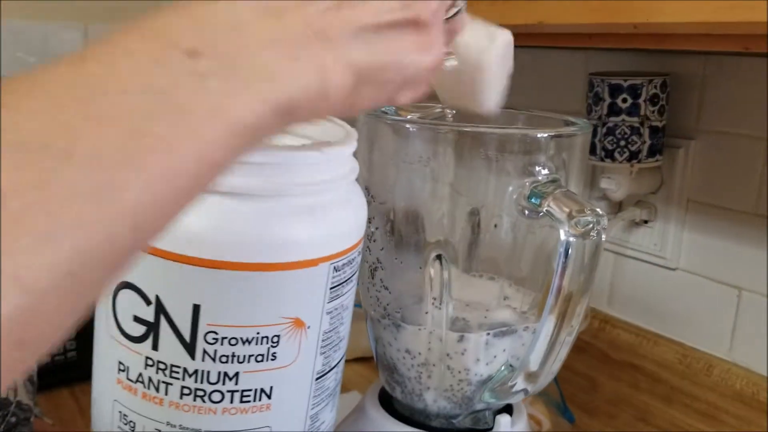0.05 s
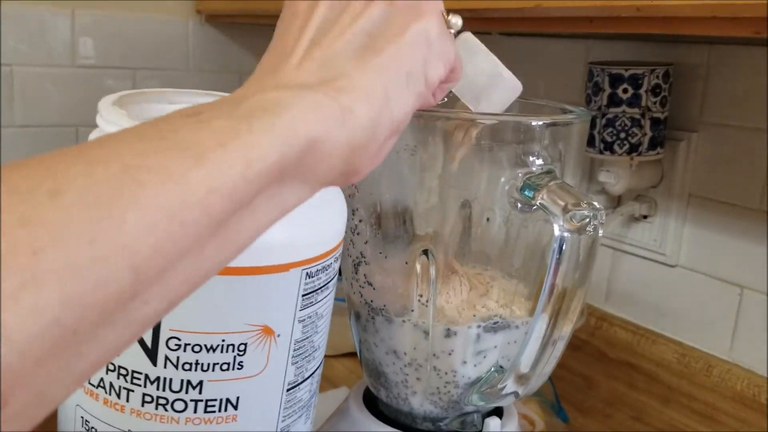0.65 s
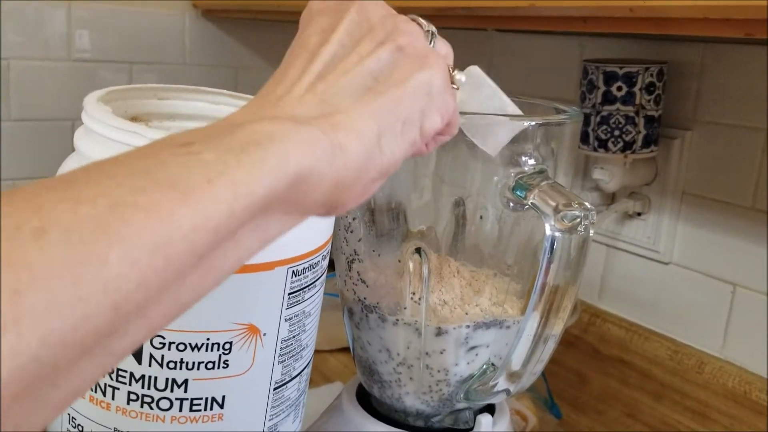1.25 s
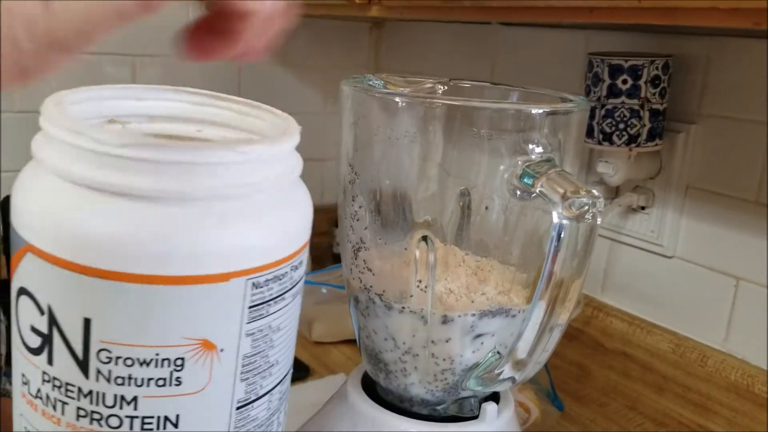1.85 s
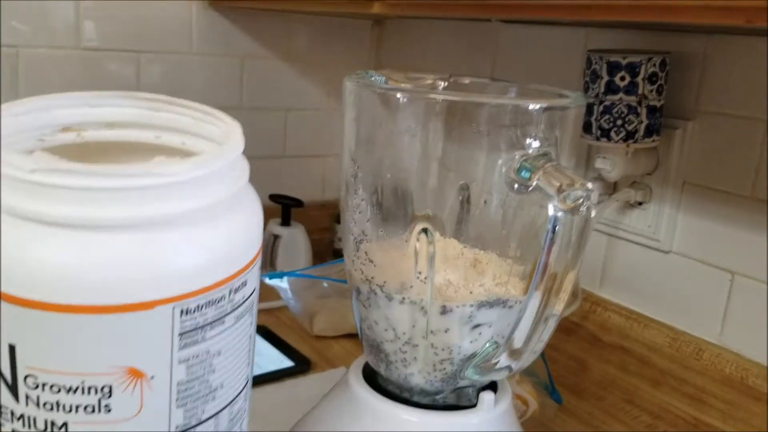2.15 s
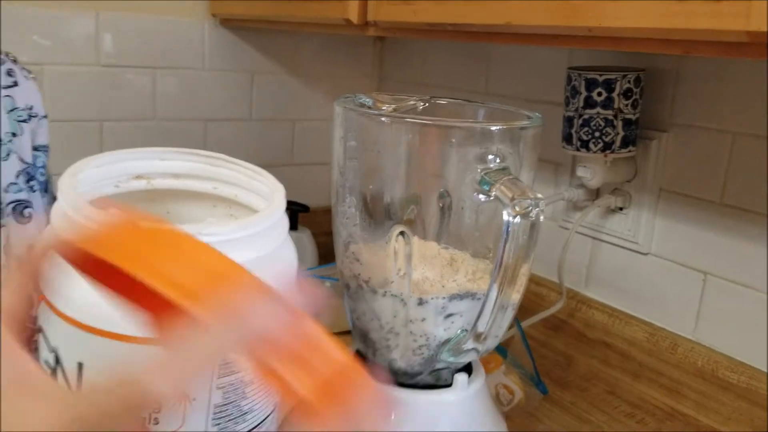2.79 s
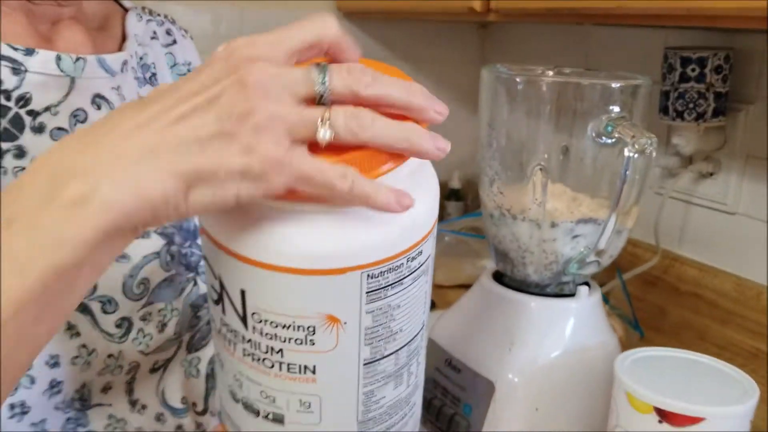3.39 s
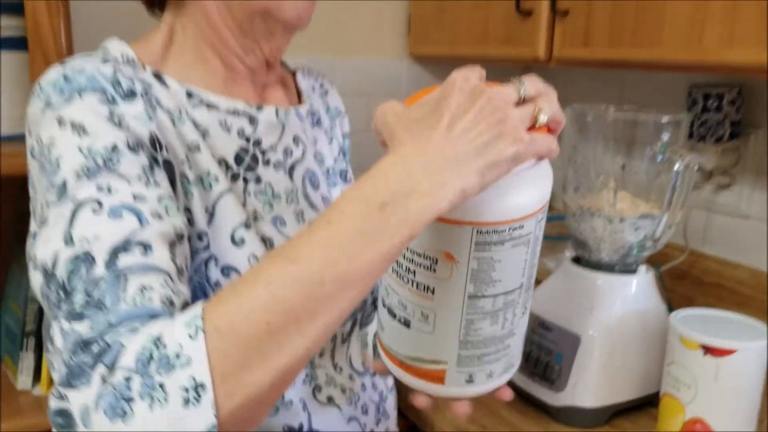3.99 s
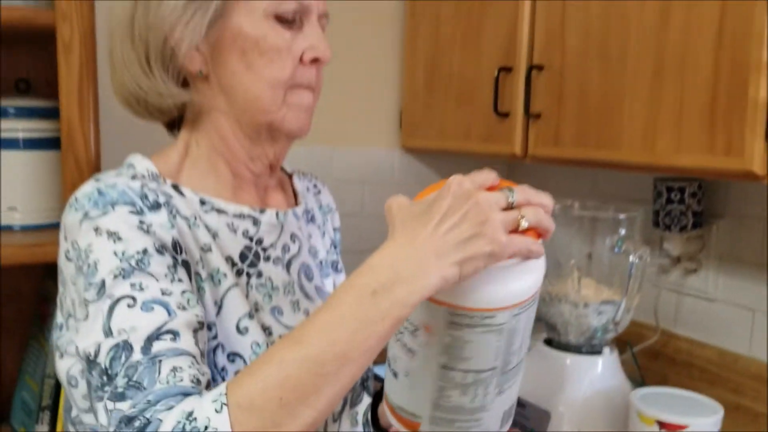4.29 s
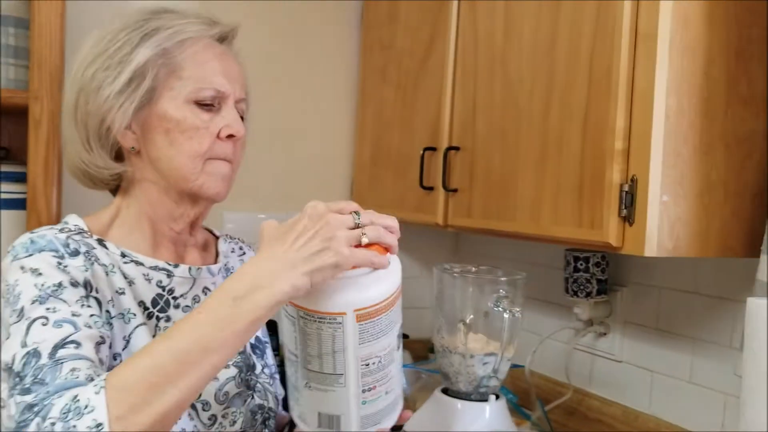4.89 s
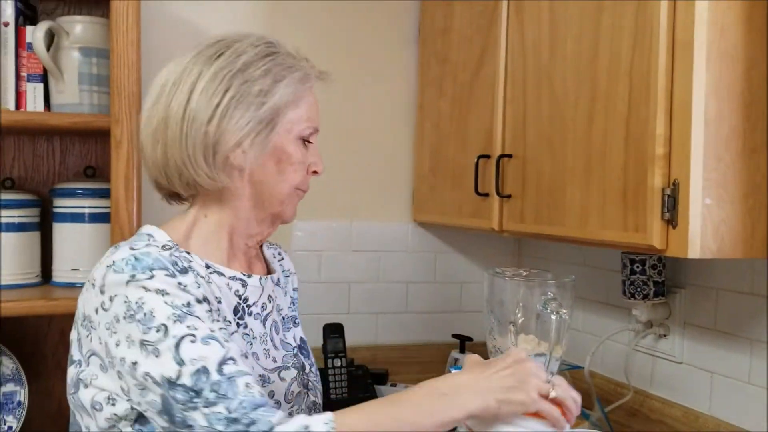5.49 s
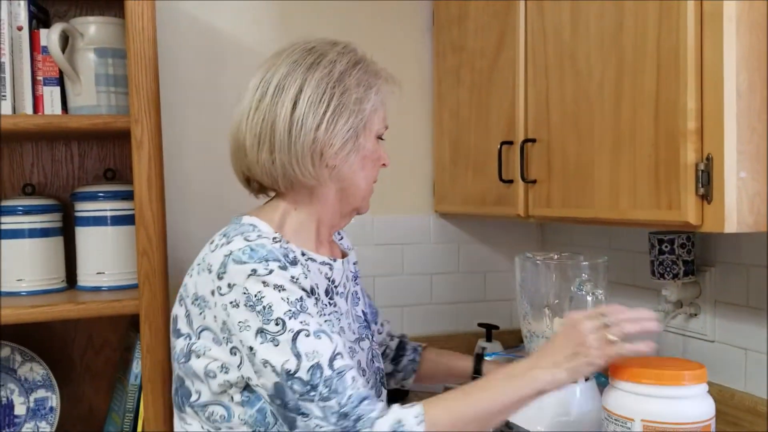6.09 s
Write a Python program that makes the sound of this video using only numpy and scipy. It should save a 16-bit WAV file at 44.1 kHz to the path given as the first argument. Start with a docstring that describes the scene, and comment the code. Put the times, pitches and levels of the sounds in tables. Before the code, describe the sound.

A faint appliance hum runs throughout in a small, slightly reverberant kitchen. In the first half second, powder slides very softly off a plastic scoop. From 0.5 to 1.2 seconds the scoop taps about five times on a glass blender jar, each click leaving a light ring. Around 1.8 to 2.1 seconds it drops into a plastic tub with small knocks and ticks. Hands and a sleeve brush the tub until about 3 seconds. The lid knocks twice, then claps on with a loud hollow clack at 3.2 seconds. It is screwed down in short, dry rubbing turns with soft bumps until about 4.5 seconds, followed by more quiet rubbing. At 5.5 seconds the tub bumps and scuffs on a wooden counter, then lands at 5.8 seconds with the loudest thud, rocking once. A slight scrape follows just after 6 seconds.

```python
"""A plastic tub is handled, its lid clapped on and screwed down, and its base set on a wooden counter.
Each impact excites damped modes of wall or wood; hands, sleeve and lid rub in short strokes of friction
noise. Before this, powder slides off a plastic scoop, which is tapped on the rim of a ringing glass
blender jar and dropped into the tub. The small kitchen reverberates and an appliance hums faintly."""
import sys
import numpy as np
from scipy import signal
from scipy.fft import rfft, irfft
from scipy.io import wavfile

SR = 44100
rng = np.random.default_rng(int(sys.argv[2]) if len(sys.argv) > 2 else 0)


def generate_wav(signal):
    """Clip the signal to [-1, 1] and save it as 16-bit WAV at the path in sys.argv[1]."""
    frames = np.transpose(np.atleast_2d(signal))
    scaled = np.clip(frames, -1, 1) * 32767
    pcm = np.round(scaled).astype(np.int16)
    wavfile.write(sys.argv[1], SR, pcm)


N = 275625
TIME = np.arange(N) / SR
AGE = np.arange(SR) / SR  # seconds since an onset

# Likeness of the two channels: frequency_hz, correlation
COHERENCE = [(60, 0.71), (180, 1), (350, 0.72), (700, 0.53), (1400, 0.062), (4000, 0.12), (14000, 0.025)]
# Reverberation time: frequency_hz, t60_s
ROOM_DECAY = [(100, 0.32), (250, 0.45), (800, 0.46), (2000, 0.45), (5000, 0.32), (14000, 0.29)]
# Appliance motor partials: pitch_hz, level_db
MOTOR_PARTIALS = [(58.5, -59), (117.5, -62)]

# Spectral shapes of continuous noise: frequency_hz, relative_density_db
AIR_SPECTRUM = [(20, -56), (30, -38), (45, -0.5), (58, -9.5), (78, -7.5), (115, -3.5), (140, -4),
                (200, -11.5), (260, -10.5), (430, -17), (520, -23.5), (750, -26.5), (1300, -29),
                (1700, -43.5), (2600, -36), (3200, -49), (6500, -50.5), (9000, -64), (12500, -42.5),
                (16000, -47)]
HISS_SPECTRUM = [(3500, -7.5), (5500, -4), (7300, -5), (9000, -8.5), (11000, -1.5), (12700, -1.5),
                 (14500, -4.5), (16000, 0.5)]  # light touch
SCRAPE_SPECTRUM = [(900, -8), (1500, -12), (2200, 3), (3200, -2.5), (4300, 0), (5200, -9), (7000, -8),
                   (10000, -18)]  # pressed contact
CAVITY_SPECTRUM = [(60, 2), (250, -1), (500, -4), (800, -5.5), (1300, -4.5), (1900, -7), (3000, -21),
                   (8000, -62)]  # hollow of the vessel
RUMBLE_SPECTRUM = [(30, -22), (55, 13), (85, -7), (120, 3), (190, 3.5), (280, -17), (450, -45), (1000, -45),
                   (4000, -66)]  # counter top
# Spectral shapes of densely packed modes: frequency_hz, relative_density_db
SCOOP_SPECTRUM = [(200, -1.5), (450, -11), (620, 6), (850, -16), (1700, -11), (2050, -16.5), (2500, -1.5),
                  (3500, -11), (4400, -9), (6300, -13.5), (9000, -19), (16000, -22)]
WALL_SPECTRUM = [(120, -28), (300, -5.5), (900, -8.5), (1600, -6), (3300, -4), (5000, -13.5), (7000, -20),
                 (9000, -30.5), (13000, -27.5), (16000, -42)]
WOOD_SPECTRUM = [(100, -20), (200, -1.5), (700, 2), (1300, -6.5), (2100, -14.5), (3000, -32.5), (5000, -37),
                 (9000, -21), (16000, -66)]
# Separately audible modes: pitch_hz, relative_level_db, t60_s
JAR_MODES = [(1156, 0, .38), (2848, -1.5, .32), (4727, -13, .22)]
TUB_MODES = [(205, -4, .15), (255, 0, .14), (320, 0, .15), (430, -4, .09), (600, -4, .06), (735, -6, .05),
             (861, -3, .05), (980, -1, .06), (1280, 0, .07), (1730, -8, .05), (1850, -9, .04),
             (2630, -9, .04), (3010, -5, .04), (3180, -3, .05), (3880, -7, .04), (5360, -11, .03)]
COUNTER_MODES = [(58.6, -24, 0.32), (109, -16, 0.21), (187.3, 3, 0.3), (215.3, 8.5, 0.22),
                 (228, -0.5, 0.51), (311.5, 2, 0.23), (456, -4, 0.14), (544.4, -5.5, 0.71), (683, -1, 0.24),
                 (628, 0, 0.26), (785, 5, 0.15), (860, 5.5, 0.024), (1196, -9.5, 0.6), (1450, -28, 0.2),
                 (1572, -36, .12), (1854, -13, 0.15), (1910, -22, 0.3)]

# Sliding contacts: start_s, length_s, strength_db, pressure_db
POWDER_POURS = [(.02, 0.39, -78, -1), (.16, .055, -66.5, -13), (.5, 0.14, -84.5, 13.5)]
HAND_STROKES = [(2.308, 0.026, -47, -2), (2.35, 0.14, -57, 5.5), (2.49, 0.14, -65.5, 6),
                (2.69, .18, -58, 2), (2.99, 0.093, -54, 0.5), (3.09, 0.077, -56.5, -1),
                (4.0, .16, -57.5, -23), (4.645, 0.22, -53, -11), (5.085, 0.32, -58, -0.5),
                (5.33, 0.28, -56, -6), (6.09, 0.052, -71.5, 18.5), (6.155, .085, -58, 13)]
LID_STROKES = [(3.16, 0.1, -49.5, 3), (3.26, 0.29, -61, -4), (3.52, 0.098, -54, 0.5),
               (3.61, 0.13, -49.5, 0.5), (3.72, 0.14, -60.5, 7), (3.86, 0.29, -67, 2.5),
               (3.96, 0.069, -52, -1), (4.245, 0.31, -50.5, 1), (4.97, 0.083, -61.5, 7.5)]
TUB_DRAG_STROKES = [(5.465, 0.086, -60, 5.5), (5.6, 0.1, -66.5, 11.5), (5.69, 0.065, -57, 6.5),
                    (5.8, .09, -59.5, 14.5), (5.91, .16, -71, 17)]
# Quick resonant strokes: middle_s, half_length_s, pitch_hz, level_db
SWISH_STROKES = [(0.543, 0.025, 1740, -62.5), (2.435, 0.039, 2320, -56), (5.299, 0.05, 2460, -62.5)]
# Scoop striking the jar's rim: start_s, strength_db
RIM_TAPS = [(.514, -79), (0.536, -64.5), (0.722, -50.5), (0.883, -50), (1.089, -58.5), (1.224, -52.5)]
# Plastic edges catching: start_s, level_db
EDGE_CATCHES = [(1.716, -64), (1.91, -60.5), (1.985, -67), (2.109, -49.5), (2.307, -57), (2.954, -64),
                (2.974, -65), (3.008, -74), (3.039, -50), (3.281, -52), (4.248, -57.5), (5.458, -45),
                (5.693, -54), (6.098, -65)]
# Scoop, fingers and lid striking the tub: start_s, flex_pitch_hz, strength_db, hardness_db
WALL_KNOCKS = [(0.345, 317, -69.5, 5.5), (1.752, 356, -57, 4.5), (1.787, 255, -45, -27),
               (1.929, 343, -52.5, 4), (2.848, 308, -62, -1), (3.039, 332, -40, -12),
               (3.118, 352, -46, -15), (3.233, 272.4, -27.5, -5.5), (3.324, 328, -51.5, -2),
               (3.471, 156, -45.5, -17.5), (3.515, 136, -47.5, -30), (3.635, 150, -48.5, -10),
               (3.989, 304, -55.5, 1), (4.249, 335, -63.5, 6), (4.981, 305, -53, -18),
               (5.088, 300, -72.5, 9), (5.459, 236, -39, -11.5), (5.467, 196, -35.5, -15),
               (5.526, 200, -56, 1), (5.604, 302, -48.5, -9), (5.692, 309, -52, -0.5), (6.099, 295, -60, 1)]
# Position of the knocks within the scene: time_s, left_over_right_db
TUB_PAN = [(1.8, 1), (3.2, 0), (5.5, -.5)]
# Counter taking the tub's weight: start_s, level_db
COUNTER_THUDS = [(5.466, -34), (5.793, -41)]
# Tub's base striking the counter: start_s, strength_db, low_cutoff_hz
BASE_LANDINGS = [(5.785, -21.5, 440), (5.793, -25.5, 131), (5.838, -32.5, 109)]


def from_db(db):
    """Amplitude grows tenfold every 20 dB."""
    return 10 ** (np.asarray(db) / 20)


def unit_power(x):
    """Division by the RMS value gives unit power."""
    return x / np.sqrt(np.mean(x ** 2) + 1e-20)


def unit_attack(x):
    """An impact is scaled to unit power over its first 20 ms."""
    return x / np.sqrt(np.mean(x[..., :SR // 50] ** 2) + 1e-20)


def at_hz(points, hz):
    """Interpolation on a logarithmic frequency axis."""
    frequencies, values = np.transpose(points)
    return np.interp(np.log(hz), np.log(frequencies), values)


def butter(x, hz, kind, order=2):
    """A causal Butterworth filter has a maximally flat passband."""
    return signal.sosfilt(signal.butter(order, hz, kind, fs=SR, output="sos"), x + 1e-18)


def band(x, low_hz, high_hz):
    """Cascaded filters give crossover slopes of 24 dB per octave."""
    for _ in range(2):
        x = butter(butter(x, low_hz, "high"), high_hz, "low")
    return x


def add(out, start_s, sound):
    """Superposition: a sound adds linearly to the mix."""
    start = int(start_s * SR)
    out[:, start:start + sound.shape[-1]] += sound[..., :N - start]


def panned(x, db):
    """A level difference between the ears shifts a source, leftward when positive."""
    return x * from_db([[db / 2], [-db / 2]])


def noise(spectrum, size):
    """Coloured noise in a diffuse field is partly coherent in the bass, incoherent in the treble."""
    hz = np.maximum(np.arange(size // 2 + 1) * SR / size, 1)
    coherence = np.clip(at_hz(COHERENCE, hz), 0, 1)
    mid, side = rfft(rng.standard_normal((2, size)))
    pair = np.sqrt(1 + coherence) * mid + np.sqrt(1 - coherence) * side * [[1], [-1]]
    return unit_power(irfft(pair * from_db(at_hz(spectrum, hz)), size))


def decay(t60_s):
    """Damping lowers a free vibration exponentially, by 60 dB in t60_s."""
    return from_db(-60 * AGE / t60_s)


def ring(modes, spread_db):
    """A struck body vibrates as a sum of damped modes, each excited with a random strength."""
    out = np.zeros(SR)
    for k, (hz, db, t60_s) in enumerate(modes):
        amplitude = (-1) ** k * from_db(db + spread_db * rng.standard_normal())
        out += amplitude * np.sin(2 * np.pi * hz * AGE) * decay(t60_s)
    return unit_attack(out)


def crack(spectrum, t60_s, snap_db):
    """Overlapping modes merge into noise: a brief snap, then a short decay."""
    envelope = decay(t60_s) + from_db(snap_db) * np.exp(-AGE / .002)
    return unit_attack(noise(spectrum, SR) * envelope)


def kitchen(x, wet_db):
    """Reflections from tiles and cupboards add a diffuse tail, longest in the middle register."""
    edges_hz = np.geomspace(80, 18000, 9)
    white = noise([(20, 0), (20000, 0)], SR)
    tail = sum(butter(white, [low, high], "band") * decay(at_hz(ROOM_DECAY, np.sqrt(low * high)))
               for low, high in zip(edges_hz, edges_hz[1:]))
    tail *= np.clip(AGE / .005 - .5, 0, 1)  # reflections follow the direct sound
    tail /= np.sqrt(np.sum(tail ** 2) / 2)
    return x + from_db(wet_db) * signal.fftconvolve(x, tail, axes=1)[:, :N]


def room_tone(air_db=-55.5, waver_rad=.44, waver_hz=11.4):
    """Phase modulation makes a motor's hum waver over low air noise."""
    waver = waver_rad * unit_power(butter(rng.standard_normal(N + SR), waver_hz, "low")[SR:])
    hum = sum(from_db(db) * np.sqrt(2) * np.sin(2 * np.pi * hz * TIME + waver)
              for hz, db in MOTOR_PARTIALS)
    return from_db(air_db) * noise(AIR_SPECTRUM, N) + hum


def edge_tick():
    """The brief contact of a hard edge radiates only treble."""
    return butter(crack(HISS_SPECTRUM, t60_s=.025, snap_db=0), 6300, "high", order=3)


def edge_catches():
    """Edges of scoop and lid catch on the tub, each catch a light impulse."""
    out = np.zeros((2, N))
    for start_s, db in EDGE_CATCHES:
        add(out, start_s, from_db(db) * edge_tick())
    return kitchen(out, wet_db=-8)


def scoop_taps(firm_db=-49, ring_slope=.83, rock_slope=.19, rock_hz=53):
    """Impact excites free vibration: the scoop clicks, the jar rings, the blender rocks on its feet."""
    clicks, ticks, ringing = np.zeros((3, 2, N))
    rocking = np.sin(2 * np.pi * rock_hz * AGE) * decay(t60_s=.75)
    for start_s, db in RIM_TAPS:
        add(clicks, start_s, from_db(db + 4.5) * crack(SCOOP_SPECTRUM, t60_s=.085, snap_db=-16))
        add(ticks, start_s, from_db(db - 1.5) * edge_tick())
        drop_db = firm_db - db  # jar and blender follow only part of a softer tap's drop
        add(ringing, start_s, from_db(firm_db - ring_slope * drop_db) * ring(JAR_MODES, spread_db=4))
        add(ringing, start_s, from_db(firm_db + 4 - rock_slope * drop_db) * rocking)
    return kitchen(clicks, wet_db=-5.5) + kitchen(ticks, wet_db=-7) + ringing


def friction(spectrum, grain_db):
    """Tiny slips cluster in clumps of a few milliseconds, modulating the friction noise."""
    clumps = unit_power(butter(rng.standard_normal(N), 176, "low"))
    return unit_power(noise(spectrum, N) * from_db(grain_db * clumps))


def grit(per_s=70, size_db=4):
    """Pressed contacts catch and snap free in sparse slips, independently, as a Poisson process."""
    caught = rng.random(N) < per_s / SR
    sizes = from_db(size_db * np.minimum(rng.exponential(1, N), 3))
    impulses = caught * sizes * rng.choice([-1, 1], N)
    snap = crack(SCRAPE_SPECTRUM, t60_s=.008, snap_db=0)
    return unit_power(signal.fftconvolve(impulses[None], snap, axes=1)[:, :N])


def strokes(rows, attack_share, swell_db, release_s):
    """Friction swells with sliding speed; strokes add in power to give gains of touch and pressure."""
    light, pressed = np.zeros((2, 1, N))
    for start_s, length_s, db, pressure_db in rows:
        speed = np.sin(np.pi * np.minimum(AGE / length_s, 1))
        attack = np.sin(np.pi / 2 * np.minimum(AGE / (attack_share * length_s), 1)) ** 2
        release = np.exp(-np.maximum(AGE - length_s, 0) / release_s)
        power = (attack * release * from_db(db + swell_db * (speed - 1))) ** 2
        add(light, start_s, power)
        add(pressed, start_s, power * from_db(pressure_db) ** 2)
    return np.sqrt(light), np.sqrt(pressed)


def sliding(light, pressed, hollow_db, scrape_db, hiss_db, grit_db, grain_db):
    """Stick-slip friction wavers: a light touch hisses; pressure adds cavity sound, scrape and grit."""
    hollow = from_db(hollow_db) * friction(CAVITY_SPECTRUM, grain_db)
    scrape = from_db(scrape_db) * friction(SCRAPE_SPECTRUM, grain_db)
    waver_db = .94 * unit_power(butter(rng.standard_normal(N), 24.5, "low"))
    hiss = from_db(hiss_db) * friction(HISS_SPECTRUM, grain_db)
    grains = from_db(grit_db) * grit()
    return from_db(waver_db) * (light * hiss + pressed * (hollow + scrape + grains))


def swishes(half_width_hz=260, rise_hz=170):
    """A resonance narrows rubbing noise to a band that climbs as the stroke swells and fades."""
    out = np.zeros((2, N))
    for middle_s, half_length_s, hz, db in SWISH_STROKES:
        progress = np.clip((TIME - middle_s) / half_length_s, -4, 4)
        phase = 2 * np.pi * np.cumsum(hz + rise_hz * progress) / SR
        rubbing = butter(rng.standard_normal((2, N)), half_width_hz, "low") * np.sin(phase)
        out += from_db(db) * np.exp(-progress ** 2 / 2) * unit_power(rubbing)
    return out


def handling():
    """Sliding friction of powder on the scoop, hands and sleeve on the tub, and the lid on its thread."""
    powder = sliding(*strokes(POWDER_POURS, attack_share=.29, swell_db=-4.5, release_s=.03),
                     hollow_db=4, scrape_db=-12, hiss_db=.5, grit_db=-18, grain_db=2.5)
    hands = sliding(*strokes(HAND_STROKES, attack_share=.42, swell_db=3, release_s=.044),
                    hollow_db=-8.5, scrape_db=-7.5, hiss_db=-1.5, grit_db=-17, grain_db=-.2)
    lid = sliding(*strokes(LID_STROKES, attack_share=.16, swell_db=4.5, release_s=.033),
                  hollow_db=-6, scrape_db=-4.5, hiss_db=-1.5, grit_db=-17, grain_db=-1.5)
    return kitchen(powder + hands + lid + swishes(), wet_db=-12.5)


def tub_drags():
    """Forced vibration: the counter rumbles under the dragging tub and booms as it takes the weight."""
    light, pressed = strokes(TUB_DRAG_STROKES, attack_share=.042, swell_db=1.5, release_s=.03)
    rub = sliding(light, pressed, hollow_db=4.5, scrape_db=-13, hiss_db=2.5, grit_db=-15.5, grain_db=.8)
    rumble = light * from_db(13) * friction(RUMBLE_SPECTRUM, grain_db=0)
    for start_s, db in COUNTER_THUDS:
        boom = butter(noise(RUMBLE_SPECTRUM, SR) * decay(t60_s=.47), 600, "low")
        add(rumble, start_s, from_db(db) * boom)
    return kitchen(rub, wet_db=-7.5) + rumble


def tub_knocks(wall_hz=254, stiff_db_per_octave=12.5):
    """A thin wall flexes at a pitch set by the grip; harder contacts excite more of its high modes."""
    out = np.zeros((2, N))
    for start_s, flex_hz, strength_db, hardness_db in WALL_KNOCKS:
        modes = ring(TUB_MODES, spread_db=3)
        blow = modes + from_db(3) * crack(WALL_SPECTRUM, t60_s=.1, snap_db=-2)
        stiffness_db = stiff_db_per_octave * np.log2(flex_hz / wall_hz)
        registers = [(150, 650, -4),  # thump
                     (650, 1600, hardness_db / 2 + stiffness_db - 3),  # body, stronger at a stiff spot
                     (1600, 6000, hardness_db - 2),  # clack
                     (6000, 19000, hardness_db - 12)]  # tick
        shell = sum(from_db(db) * unit_attack(band(blow, low, high)) for low, high, db in registers)
        flex = from_db(-2) * unit_attack(np.sin(2 * np.pi * flex_hz * AGE) * decay(t60_s=.098))
        pan_db = np.interp(start_s, *np.transpose(TUB_PAN))
        add(out, start_s, from_db(strength_db) * panned(shell + flex, pan_db))
    return kitchen(out, wet_db=-6.5)


def tub_landing(contact_hz=3250):
    """The base lands on edge, falls flat and rocks once; soft contact low-passes the counter's modes."""
    out = np.zeros((2, N))
    for start_s, db, low_cutoff_hz in BASE_LANDINGS:
        modes = from_db(-3) * ring(COUNTER_MODES, spread_db=.5)
        wood = from_db(-2) * crack(WOOD_SPECTRUM, t60_s=.12, snap_db=-32)
        blow = butter(modes + wood, low_cutoff_hz, "high")
        add(out, start_s, from_db(db) * butter(blow, contact_hz, "low"))
    return kitchen(out, wet_db=-5)


def scene():
    """The sources superpose, all a little louder on the left."""
    tub = tub_knocks() + edge_catches() + handling() + panned(tub_landing() + tub_drags(), db=-1.1)
    return panned(scoop_taps() + tub, db=4) + panned(room_tone(), db=4.5)


def record(dry, low_hz=33, high_hz=15900):
    """Band limiting: the microphone loses the deepest bass, and the top is cut steeply."""
    treble_cut = signal.ellip(12, .1, 80, high_hz, fs=SR, output="sos")
    return signal.sosfilt(treble_cut, butter(dry, low_hz, "high", order=3))


dry = scene()
out = record(dry)
generate_wav(out)
```